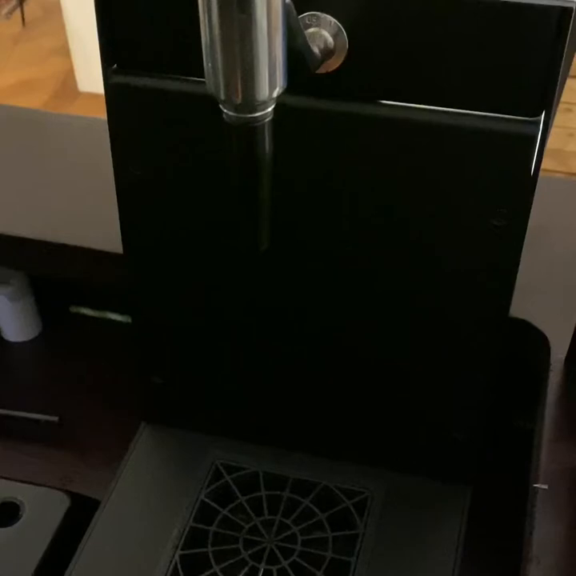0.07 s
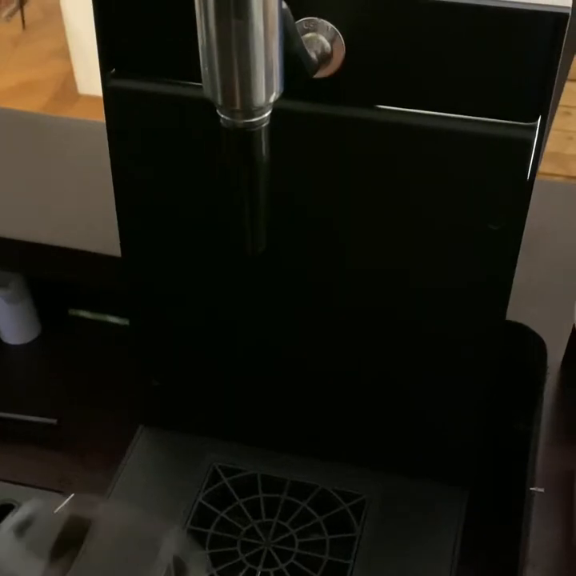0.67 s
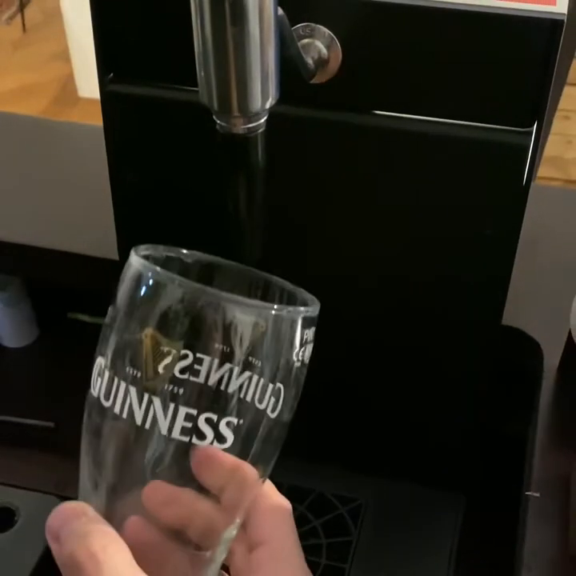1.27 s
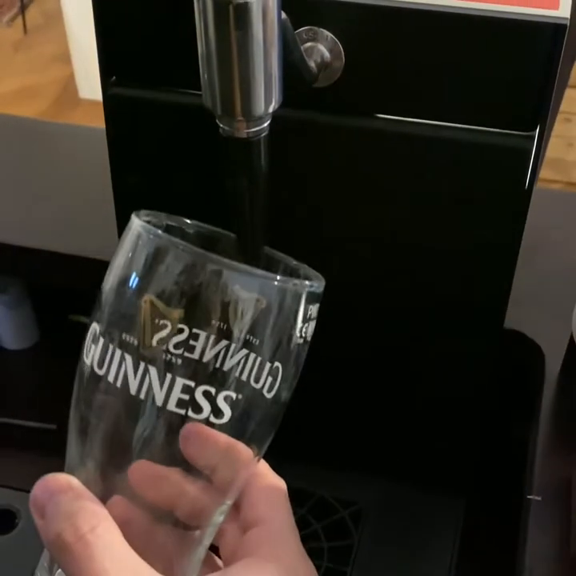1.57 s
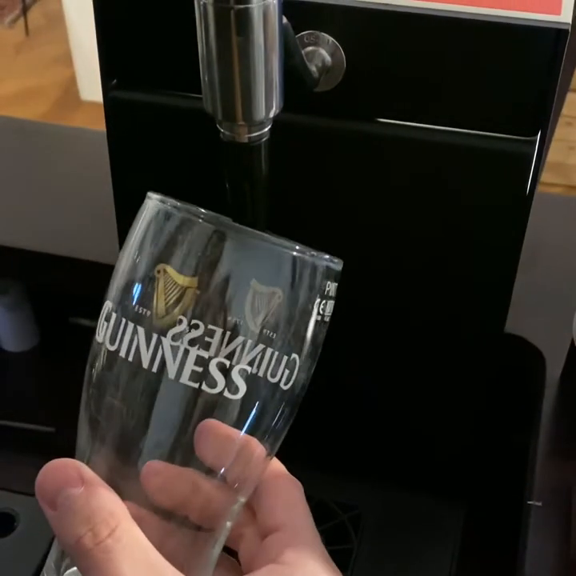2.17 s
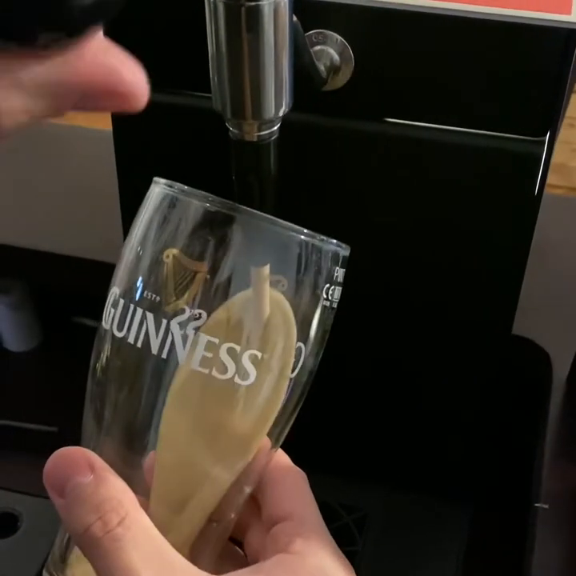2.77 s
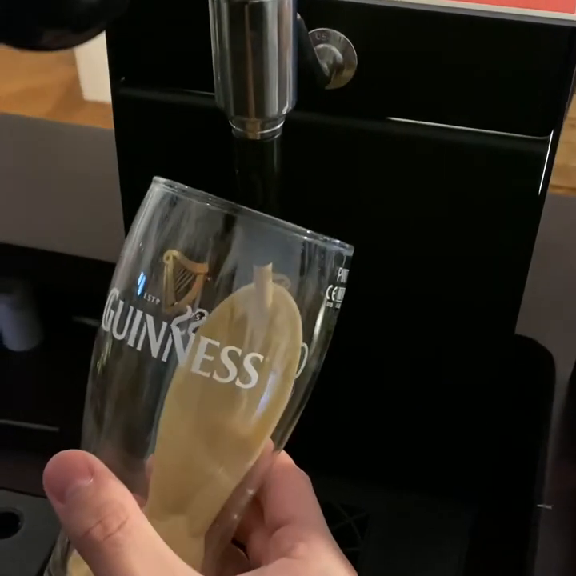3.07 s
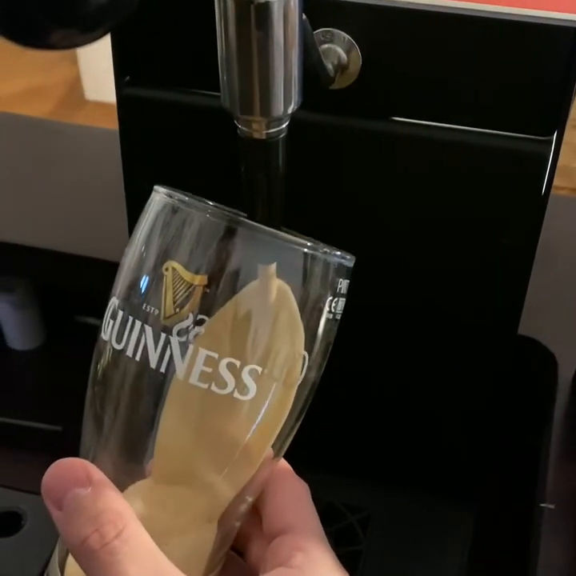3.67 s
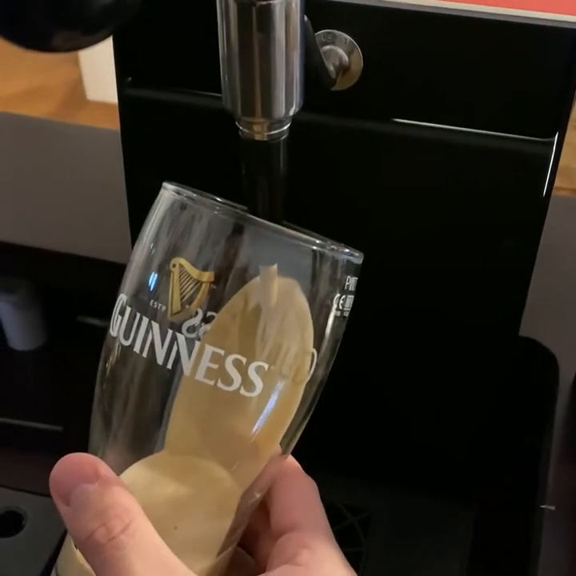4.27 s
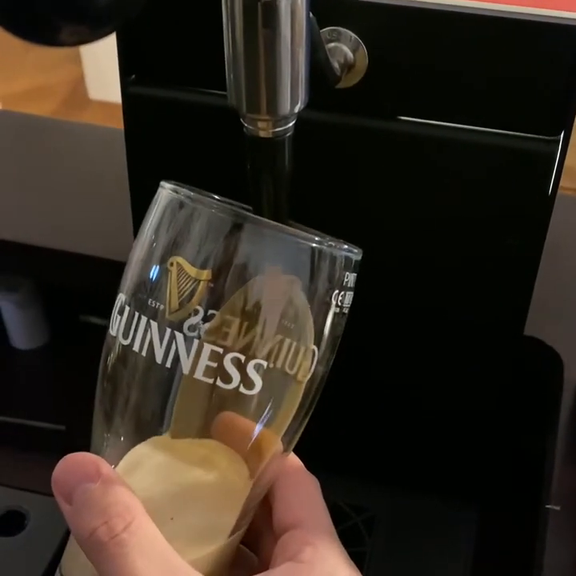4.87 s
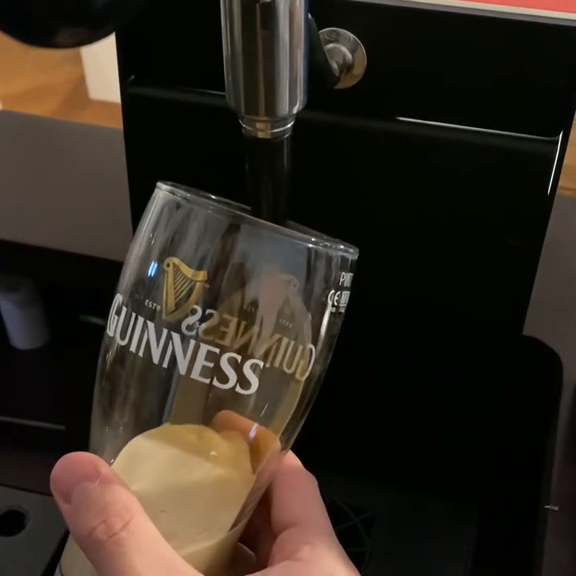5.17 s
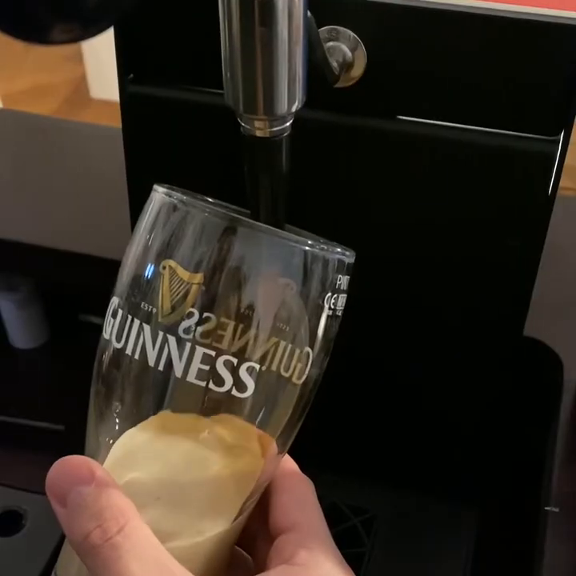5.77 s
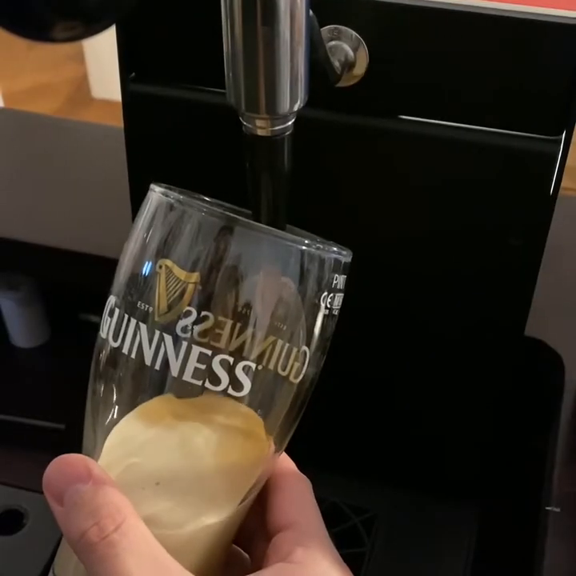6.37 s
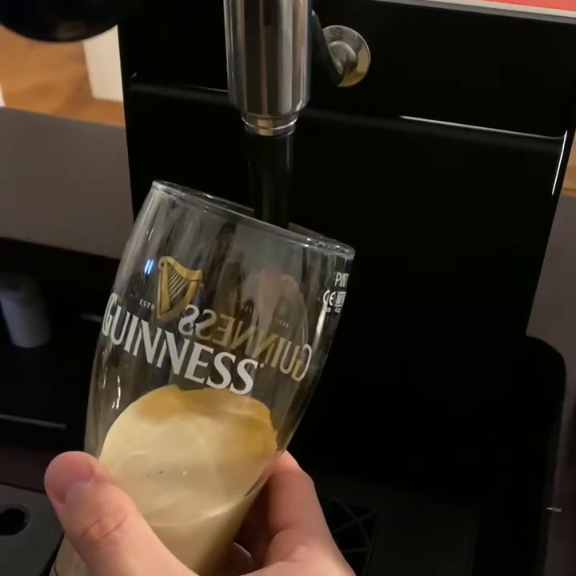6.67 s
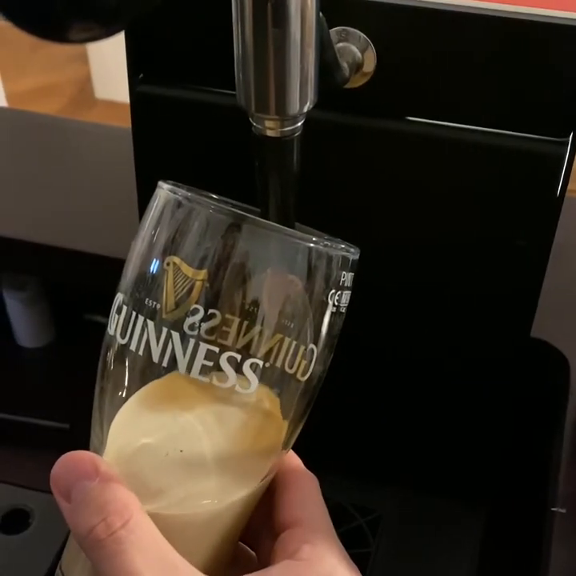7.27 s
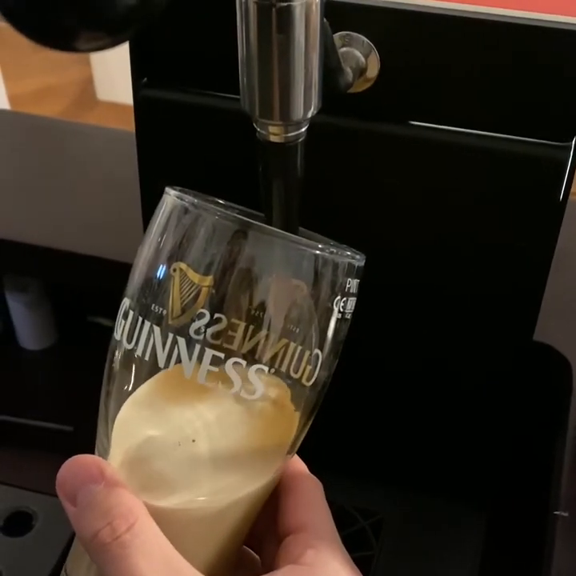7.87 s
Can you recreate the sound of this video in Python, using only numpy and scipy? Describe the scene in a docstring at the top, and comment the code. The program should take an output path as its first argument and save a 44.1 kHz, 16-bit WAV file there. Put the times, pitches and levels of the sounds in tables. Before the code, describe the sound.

Coolers hum and something knocks, then beer spits from a tap and pours into a glass with a brightening, fizzy hiss.

```python
"""Beer drawn into a tilted glass, close to a phone's two microphone ports, in a room where coolers hum.
Faint blips and an airy rustle come first; at 1.2 s something knocks and the room answers.
At 2.2 s the tap opens and splutters, the beer line shudders, and the stream hisses down the glass wall.
From 4.5 s gas breaking out in the spout swells into a shrill fizz, while foam cushions the stream.
Throughout, both ports hear the same bass, while the treble drifts out of phase between them."""
import sys
import numpy as np
from scipy import signal
from scipy.fft import rfft, irfft, next_fast_len
from scipy.io import wavfile
from scipy.ndimage import map_coordinates

SR = 44100
rng = np.random.default_rng(int(sys.argv[2]) if len(sys.argv) > 2 else 0)


def file_out(sig):
    """Save sig as 16-bit WAV at sys.argv[1]."""
    # one column per channel
    cols = np.atleast_2d(sig).T
    # limit, then scale
    lim = np.clip(cols, -1, 1)
    pcm = np.round(lim * 32767).astype(np.int16)
    wavfile.write(sys.argv[1], SR, pcm)


N = 349713
TIME = np.arange(N) / SR
OPEN_S, OPEN_RISE_S = 2.173, 0.26  # the tap opens and the flow builds


def amp(db):
    """Decibels to gain."""
    return 10 ** (np.asarray(db) / 20)


def unit(x):
    """Scale to rms 1."""
    return x / np.sqrt(np.mean(x ** 2) + 1e-20)


def along(points, hz):
    """(Hz, value) points read on a log axis."""
    freqs, values = np.transpose(points)
    return np.interp(np.log(hz + 1), np.log(freqs + 1), values)


def curve(points, column=1):
    """One column of (s, value, ..) points joined by straight lines."""
    columns = np.transpose(points)
    return np.interp(TIME, columns[0], columns[column])


def rise(start_s, length_s):
    """A smooth step from 0 to 1."""
    return np.sin(np.pi / 2 * np.clip((TIME - start_s) / length_s, 0, 1)) ** 2


def hump(peak_s, half_length_s):
    """A gain that swells to 1 and dies away again."""
    return np.exp(-2 * ((TIME - peak_s) / half_length_s) ** 2)


def wobble(rate):
    """A smooth random curve, rate knots a second."""
    return map_coordinates(rng.standard_normal(int(N * rate / SR) + 4), [TIME * rate])


def bell(hz, centre, width):
    """The power curve of one resonance."""
    return 1 / (1 + (2 * (hz - centre) / width) ** 2)


def filtered(x, response):
    """x through a frequency response."""
    size = next_fast_len(N + 8192)
    return irfft(rfft(x, size) * response(np.fft.rfftfreq(size, 1 / SR)), size)[..., :N]


def coloured(x, spectrum, modes=()):
    """x at rms 1 with a broad spectrum and resonances on top of it."""
    peaks_db = lambda hz: sum(db * bell(hz, centre, width) for centre, width, db in modes)
    return unit(filtered(x, lambda hz: amp(along(spectrum, hz) + peaks_db(hz))))


def swept(x, centre_hz, width_hz, db):
    """x through a moving resonance, or a hollow if db is negative."""
    hz, t, frames = signal.stft(x, SR, nperseg=512)
    per_frame = lambda v: np.interp(t, TIME, v * np.ones(N))
    gain = amp(per_frame(db) * bell(hz[:, None], per_frame(centre_hz), width_hz))
    return signal.istft(frames * gain, SR, nperseg=512)[1][:, :N]


def noise():
    """Two unrelated rows of turbulence: what the ports share, and what sets them apart."""
    return rng.standard_normal((2, N))


def bubbles(rate, share, spread_db=3):
    """Tiny bursts of scattered size, rate a second, carry a share of the power; turbulence the rest."""
    onsets = rng.random(N) < rate / SR
    sizes = onsets * amp(spread_db * np.minimum(rng.exponential(size=N), 4))
    return np.sqrt(share) * unit(sizes * noise()) + np.sqrt(1 - share) * noise()


def swells(rows, order=1):
    """Short swells of noise, each in one resonance; a higher order gives it steeper sides."""
    out = np.zeros((2, N))
    for peak_s, centre, width, half_length, db in rows:
        near = np.flatnonzero(abs(TIME - peak_s) < 2 * half_length)
        hz = np.fft.rfftfreq(len(near), 1 / SR)
        band = unit(irfft(rfft(noise()[:, near]) * bell(hz, centre, width) ** order, len(near)))
        out[:, near] += amp(db) * hump(peak_s, half_length)[near] * band
    return out


def coolers():
    """Room tone: unsteady motor lines and throbbing fans over the rumble of moving air."""
    # motor lines: pitch_hz, level_db
    motor_lines = [(49.1, -50.5), (106.7, -48), (138.8, -51), (165.1, -44), (199.9, -44.5), (213.3, -43),
                   (231.6, -44), (300.1, -50.5), (319.8, -43), (426.5, -45.5), (639.8, -59), (694.6, -60.5)]
    # spectrum of the room's air: freq_hz, gain_db
    rumble = [(25, -40), (40, -15), (80, -9), (120, -0.5), (250, 0.2), (400, -8), (650, -13.5),
              (1000, -17.5), (1600, -22.5), (2400, -22), (4200, -29), (6000, -40), (9000, -46.5),
              (15500, -59)]
    # room resonances: centre_hz, width_hz, gain_db
    room_modes = [(57.5, 12, 13.5), (76, 18, 1.5), (120.4, 28, 3.5), (157.6, 11, -10.5), (165, 9.5, 5),
                  (316.4, 13.6, 8.5), (343, 24, -3.5), (404, 42, 6.5), (565, 140, 4.5), (606, 30, -8),
                  (938, 28, 4), (1107.5, 27, 10), (2090, 100, 5.5), (2440, 160, 4), (10920, 240, 16)]
    # the hum swells on one note: peak_s, pitch_hz, width_hz, half_length_s, level_db
    surges = [(.16, 172, 8, .09, -35), (1.08, 174.3, 5.2, .064, -29), (1.1, 424, 32, .07, -39),
              (1.15, 318, 12, .15, -38), (1.55, 176, 8, .1, -35), (2.0, 178, 6, .3, -37),
              (2.05, 318, 8, .2, -37), (2.5, 425, 8, .2, -40), (2.65, 174, 8, .1, -35),
              (2.8, 320, 10, .25, -39), (3.4, 174.7, 4.1, .14, -35), (3.98, 173, 10, .056, -31),
              (5.27, 173.7, 11, .061, -32), (5.7, 171, 8, .06, -34), (6.27, 175.6, 3.5, .12, -33),
              (6.39, 314.2, 5.1, .11, -34), (6.55, 425, 8, .2, -41), (7.74, 174, 8, .09, -33)]
    drift_s = .0018  # the motors run early or late, so their higher lines waver more
    fan_hz, fan_width_hz, fan_db = 171.8, 17, -36
    motors = np.zeros(N)
    for hz, db in motor_lines:
        gain = amp(db + 2.4 * wobble(2.996))
        phase = 2 * np.pi * (hz * TIME + rng.random()) + hz * drift_s * wobble(2.06)
        motors += gain * np.sqrt(2) * np.sin(phase)
    fan_band = lambda hz: abs(hz - fan_hz) < fan_width_hz / 2
    fans = amp(fan_db) * unit(filtered(rng.standard_normal(N), fan_band))
    air = amp(-34.5 + 0.09 * wobble(5)) * coloured(noise(), rumble, room_modes)
    return air + swells(surges) + np.array([motors + fans, np.zeros(N)])


def blips():
    """Faint blips near one note come and go in the room."""
    # narrow bands of noise: peak_s, pitch_hz, width_hz, half_length_s, level_db
    notes = [(.5, 1120, 110, .07, -51), (.93, 1125, 90, .06, -47), (1.92, 1105, 80, .05, -45),
             (5.095, 1080, 240, .06, -41), (6.175, 1110, 60, .022, -43), (6.72, 1100, 60, .025, -45),
             (7.075, 1110, 60, .03, -40)]
    return swells(notes, order=2)


def rustle():
    """A faint airy rustle while the glass is brought up."""
    # its spectrum: freq_hz, gain_db
    spectrum = [(600, -11), (2300, 2), (4000, -3), (6000, -13), (9000, -16.5), (15500, -23)]
    # its resonances: centre_hz, width_hz, gain_db
    modes = [(2520, 350, 5), (3050, 400, -4), (4750, 500, 6)]
    gain = hump(peak_s=0.7, half_length_s=0.56) * amp(-48.5 + 0.44 * wobble(2.5))
    return gain * coloured(noise(), spectrum, modes)


def knock():
    """A hard, rattling contact and a soft thud ring hollow modes; the room answers the hardest blow."""
    # contacts, the last a thud: start_s, gain_db, cutoff_hz
    blows = [(1.1853, -34, 6050), (1.1872, -20.5, 8000), (1.1938, -39, 5000), (1.217, -21, 179)]
    # modes of the knocked thing: pitch_hz, gain_db, t60_s
    modes = [(120, -6, .14), (301, -11, .15), (377, -5, .09), (900, 0, .035), (1060, -7, .035),
             (1260, -14, .06), (1863, -20, .15), (1990, -10, .025), (2250, -15, .16), (2480, 4.5, .024),
             (2640, 0, .024), (2745, -14, .2), (3120, -1, .022), (3295, -17, .14)]
    # spectrum of the contact noise: freq_hz, gain_db
    crack_spectrum = [(30, -35), (120, 5), (350, 9.5), (600, -7), (900, -1), (1800, -6.5), (2500, -5),
                      (3100, -3.5), (3900, -15.5), (4900, -12.5), (6500, -18), (9000, -20), (15500, -13)]
    t = np.arange(SR // 2) / SR
    direct, impulse = np.zeros((2, N))
    grit = coloured(noise(), crack_spectrum)[0]
    for start_s, db, cutoff_hz in blows:
        at = round(start_s * SR)
        ring = sum(amp(level + rng.normal(0, 1) - 60 * t / t60) * np.sin(2 * np.pi * hz * t)
                   for hz, level, t60 in modes)
        crack = amp(-4 - 60 * t / 0.062) * grit[at:at + len(t)]
        contact = signal.butter(2, [70, cutoff_hz], 'bandpass', fs=SR)
        direct[at:at + len(t)] += amp(db) * signal.lfilter(*contact, ring + crack)
    hardest_s, hardest_db, _ = blows[1]
    impulse[round(hardest_s * SR)] = amp(hardest_db + 33.5)
    tail = filtered(room_tail(impulse), lambda hz: amp(along(crack_spectrum, hz)))
    return np.array([direct, np.zeros(N)]) + tail


def room_tail(x):
    """The room's diffuse answer: each frequency dies at its own speed."""
    # decay between the walls: freq_hz, t60_s
    decay = [(150, 0.41), (1000, 0.49), (3000, 0.47), (8000, 0.37), (15000, 0.1)]
    hz, t, frames = signal.stft(rng.standard_normal((2, SR // 2)), SR, nperseg=256)
    tail = signal.istft(frames * amp(-60 * t / along(decay, hz)[:, None]), SR, nperseg=256)[1]
    delayed = np.pad(x, (130, 0))[None]
    return signal.fftconvolve(delayed, tail / np.linalg.norm(tail[0]), axes=1)[:, :N]


def pour():
    """The running beer: hiss, wash, whistle and froth flutter together under two moving hollows."""
    # a hollow in the sizzle climbs as the glass fills: time_s, centre_hz
    hollow = [(4.1, 10000), (4.45, 10150), (4.9, 10850), (5.2, 12000), (6.2, 12900), (7.9, 13500)]
    # the hiss dips near 7 kHz while the whistle is loudest: time_s, centre_hz, gain_db
    dip = [(4.7, 6900, 0), (5.15, 6900, -8), (5.6, 7150, -12), (6.1, 7300, -7), (6.6, 7700, -3),
           (7.9, 7900, -1)]
    flutter = wobble(25)  # the flow is never quite even
    fine_gas = rise(start_s=3.9, length_s=1.2)  # the finest fizz builds slowly and holds
    stream = jet(flutter, fine_gas) + wall_wash(flutter)
    fizz = spout_whistle(flutter) + froth(flutter, fine_gas)
    foam = swept(fizz, curve(hollow), width_hz=1150, db=-8)
    dipped = swept(stream + foam, curve(dip), width_hz=750, db=curve(dip, column=2))
    return rise(OPEN_S, OPEN_RISE_S) * dipped


def jet(flutter, fine_gas):
    """The jet hisses through the glass's air column, a little louder with gas in it."""
    # spectrum of the jet: freq_hz, gain_db
    spectrum = [(500, -51), (1200, -1.5), (2200, -6), (3000, -9), (4000, -1), (4600, -2), (5200, 1),
                (6200, 1.5), (6900, 0.5), (7800, -4), (10000, -5), (12700, -17), (14000, -30), (16000, -51)]
    # air column resonances: centre_hz, width_hz, gain_db
    air_column = [(1980, 110, 16), (2555, 65, 18.5), (3320, 200, -1), (3470, 36, 13), (3870, 120, 6),
                  (4420, 60, 10), (4520, 140, -9), (5463, 170, 10), (5900, 88, 5.5), (6357, 200, 13.5),
                  (6900, 120, -8), (6760, 200, 2.5), (7360, 120, 4)]
    gain = amp(-45 + 4 * fine_gas + .5 * flutter + 0.51 * wobble(5.8))
    return gain * coloured(bubbles(rate=3000, share=.4), spectrum, air_column)


def wall_wash(flutter):
    """The stream rushes down the bare glass wall until foam cushions it."""
    # course of the rush: time_s, level_db
    levels = [(2.3, -44.5), (2.62, -44.5), (2.76, -47.5), (2.88, -48), (3.05, -43), (3.3, -44.5),
              (3.7, -47.5), (4.1, -47), (4.6, -50.5), (7.9, -66)]
    # its spectrum: freq_hz, gain_db
    spectrum = [(250, -14), (600, 5.5), (1000, -1.5), (1500, 4), (2200, -2.5), (3000, -5), (3900, -3),
                (4600, -7), (7000, -27), (12000, -56)]
    # resonances of the tilted, empty glass: centre_hz, width_hz, gain_db
    empty_glass = [(1850, 65, 9.5), (2517, 120, 15.5), (2810, 170, 14), (3510, 57, 14), (3860, 110, 9.5),
                   (4100, 130, 6), (4830, 200, 14), (5520, 290, 14), (6200, 300, 4)]
    gain = amp(curve(levels) + 1.4 * flutter)
    return gain * coloured(bubbles(rate=3000, share=.4), spectrum, empty_glass)


def spout_whistle(flutter):
    """Gas breaking out rings the spout; the bubble cloud's own pitch picks out its shrill modes."""
    # spout modes: centre_hz, width_hz, gain_db
    modes = [(8600, 430, -2), (8580, 117, 0.5), (8900, 130, 0.5), (9125, 84, 4.5), (9560, 180, -1.5),
             (9410, 150, -3.5), (9840, 220, -3.5), (10560, 300, -5.5)]
    # ring of the bubble cloud: time_s, pitch_hz
    cloud = [(2.7, 8600), (3.6, 9000), (4.2, 9100), (4.36, 8200), (4.5, 8700), (4.68, 8650), (4.95, 8900),
             (5.7, 9000), (6.4, 8880), (7.9, 8600)]
    gas_s, gas_rise_s, ease_s = 4.508, 0.39, 2.58
    since_peak = np.maximum(TIME - gas_s - gas_rise_s, 0)
    gas = rise(gas_s, gas_rise_s) * (.5 + .5 * np.exp(-since_peak / ease_s))  # eases towards half
    spout = lambda hz: np.sqrt(sum((amp(db) * bell(hz, centre, 1.56 * width)) ** 2
                                   for centre, width, db in modes))
    cloud_hz = curve(cloud) + 120 * wobble(40)
    eddies = filtered(bubbles(rate=3000, share=.4), spout)
    ringing = unit(swept(eddies, cloud_hz, width_hz=1000, db=10))
    running_full = rise(start_s=2.46, length_s=0.34)  # only a full spout rings steadily
    _, pocket_gain, _ = gas_pockets()
    gain = running_full * amp(-46 + 23.5 * gas) + pocket_gain
    return gain * amp(0.18 * flutter + 1.06 * wobble(7.1)) * ringing


def fizzy(x):
    """x with the bright colour of tiny bubbles and droplets."""
    # spectrum of fizz: freq_hz, gain_db
    spectrum = [(5000, -32), (7500, -17), (9800, -4), (10700, -.5), (11300, 0), (12000, -.5), (13300, 0),
                (14500, 2), (15600, 3)]
    return coloured(x, spectrum)


def froth(flutter, fine_gas):
    """Countless microscopic bubbles merge into a finely grained sizzle."""
    return amp(-56.5 + 22.5 * fine_gas + 1.1 * flutter) * fizzy(bubbles(rate=2500, share=.35))


def pops():
    """Single larger bubbles burst in the glass with tiny ticks, as long as beer runs."""
    return rise(OPEN_S, OPEN_RISE_S) * amp(-66) * fizzy(bubbles(rate=45, share=1, spread_db=2.5))


def snaps():
    """Short, sharp, high ticks during the pour."""
    # ticks: start_s, level_db, low_cut_hz, t60_s
    ticks = [(2.2615, -45, 9000, .4), (2.321, -35, 3000, .025), (2.3365, -32, 3000, .025),
             (2.586, -33, 9000, .015), (2.9085, -42, 8000, .012), (2.9275, -39, 8000, .012),
             (2.978, -40, 8000, .012), (3.0015, -38, 8000, .012), (3.1215, -42, 8000, .012),
             (3.3127, -40, 8000, .012), (4.256, -41, 9000, .05), (4.6205, -35, 3000, .02),
             (5.8414, -27, 8000, .012), (5.8529, -22.5, 8000, .014), (7.3545, -34, 3000, .025)]
    # their spectrum: freq_hz, gain_db
    spectrum = [(2500, -6), (4000, 4), (4700, -4), (6000, 2), (7400, -7), (9500, 0), (15500, -2)]
    t, out = np.arange(SR // 4) / SR, np.zeros((2, N))
    hz = np.fft.rfftfreq(len(t), 1 / SR)
    for start_s, db, low_cut_hz, t60 in ticks:
        colour = amp(along(spectrum, hz)) / (1 + (low_cut_hz / (hz + 1)) ** 8)
        tick = unit(irfft(rfft(rng.standard_normal((2, len(t)))) * colour, len(t)))
        at = round(start_s * SR)
        out[:, at:at + len(t)] += amp(db - 60 * t / t60) * tick
    return out


def gas_pockets():
    """Gains of spitting, whistle and spray as pockets of gas pass through the spout."""
    # pockets: peak_s, half_length_s, spitting_db, whistle_db, spray_db
    pockets = [(2.29, .04, -55, -56, -54), (2.335, .04, -51, -50, -52), (2.44, .08, -45.5, -70, -48),
               (2.55, .08, -43.5, -47, -42.5), (2.65, .07, -47.5, -65, -50), (2.83, .1, -62, -62, -57),
               (2.99, .1, -53, -58, -53), (4.35, .09, -50, -41, -60), (4.47, .08, -48, -29.5, -56),
               (4.58, .08, -50, -34, -49), (4.72, .09, -48, -33, -54)]
    return sum(amp(dbs)[:, None] * hump(peak_s, half_length) for peak_s, half_length, *dbs in pockets)


def splutter():
    """Gas pockets tear the jet into coarse spitting and a spray of fine droplets."""
    # spectrum of the spitting: freq_hz, gain_db
    spectrum = [(1500, -14), (3300, -3), (4700, -7), (5600, 2), (6400, 3), (7400, -6), (8500, -5),
                (9800, -1), (11500, -4), (13000, -5), (15500, -9)]
    spit_gain, _, spray_gain = gas_pockets()
    ragged = amp(1.5 * wobble(60))
    spitting = amp(3) * spit_gain * coloured(bubbles(rate=700, share=.6), spectrum)
    spray = spray_gain * fizzy(bubbles(rate=700, share=.6))
    return ragged * (spitting + spray)


def gurgles():
    """Clumps of bubbles in the spout each ring in a rough band; some glide up as they shrink."""
    # chirps: peak_s, pitch_hz, glide_hz_per_s, width_hz, half_length_s, level_db
    chirps = [(2.33, 3910, 8000, 900, 0.03, -39.5), (2.43, 7200, 35000, 1110, 0.034, -56),
              (2.51, 3470, 0, 110, 0.11, -47.5), (2.5, 6150, 0, 900, 0.095, -52),
              (2.53, 9900, 0, 1300, 0.13, -39), (4.263, 9300, 2, 450, 0.028, -38),
              (4.41, 5550, 2998, 905, 0.13, -42.5), (4.418, 8560, 6000, 1000, 0.074, -33),
              (4.67, 6560, -4, 2400, 0.18, -45)]
    out = np.zeros((2, N))
    clumps = bubbles(rate=900, share=.6)
    for peak_s, pitch, glide, width, half_length, db in chirps:
        near = np.flatnonzero(abs(TIME - peak_s) < 2 * half_length)
        t, hz = TIME[near] - peak_s, np.fft.fftfreq(len(near), 1 / SR)
        roughness = np.fft.ifft(np.fft.fft(clumps[:, near]) * bell(hz, 0, width))
        ring = np.real(roughness * np.exp(2j * np.pi * (pitch + glide * t / 2) * t))
        out[:, near] += amp(db) * hump(peak_s, half_length)[near] * unit(ring)
    return out


def shudder():
    """The beer line shudders as the flow starts."""
    # one low swell: peak_s, pitch_hz, width_hz, half_length_s, level_db
    throb = [(2.72, 56.3, 9.9, 0.18, -37)]
    return swells(throb)


def ports(x):
    """The two microphone ports: partly alike, apart in phase and level by frequency."""
    # likeness of the ports: freq_hz, coherence
    alike = [(130, .998), (300, .98), (500, .92), (780, .6), (1100, .86), (1700, .98), (2300, .75),
             (2900, .3), (3600, .5), (4300, .35), (4900, .75), (6400, .88), (7300, .7), (8500, .96),
             (10500, .92), (11500, .99), (13000, 1)]
    # level between them: freq_hz, left_minus_right_db
    tilt = [(110, 0), (200, .5), (380, 2), (700, 3), (1290, 2.5), (2380, -1), (4400, 0)]
    # phase between them: freq_hz, left_lead_rad
    lead = [(30, 0), (1900, 0), (2400, .8), (3000, 3), (3500, .1), (4200, .9), (4820, 3.1), (5250, 6.3),
            (6400, 7.1), (8000, 7.8), (9500, 8.2), (10500, 8.7), (11300, 9.2), (13000, 3 * np.pi)]
    angle = lambda hz: np.arccos(np.clip(along(alike, hz), 0, 1)) / 2
    shared, apart = filtered(x, lambda hz: np.array([np.cos(angle(hz)), np.sin(angle(hz))]))
    sides = np.array([[.5], [-.5]])
    lean = lambda hz: amp(sides * along(tilt, hz)) * np.exp(1j * sides * along(lead, hz))
    return filtered(np.array([shared + apart, shared - apart]), lean)


def scene():
    """The tap close up and the room around it, heard at the two ports."""
    room = coolers() + blips() + rustle() + knock()
    close = pour() + pops() + snaps() + splutter() + gurgles() + shudder()
    return ports(room + close)


def record(dry):
    """The phone keeps nothing above its band limit."""
    return filtered(dry, lambda hz: hz < 15800)


dry = scene()
out = record(dry)
file_out(out)
```